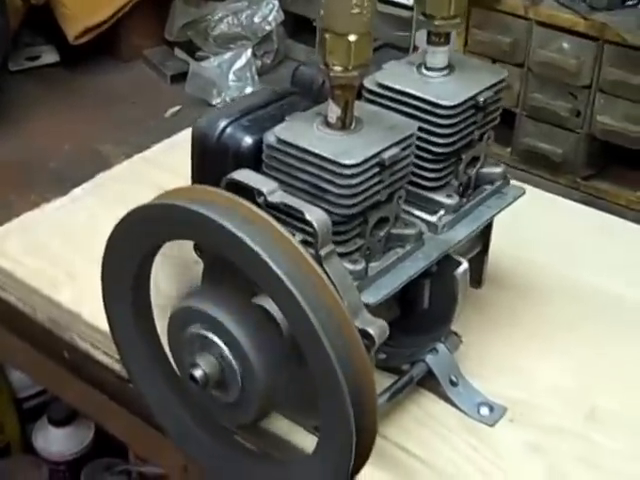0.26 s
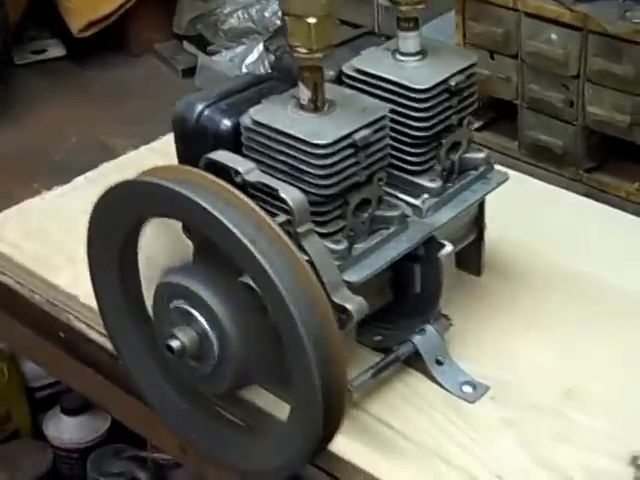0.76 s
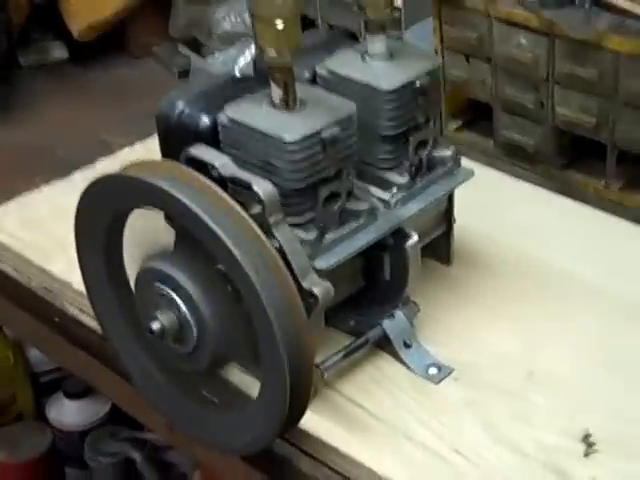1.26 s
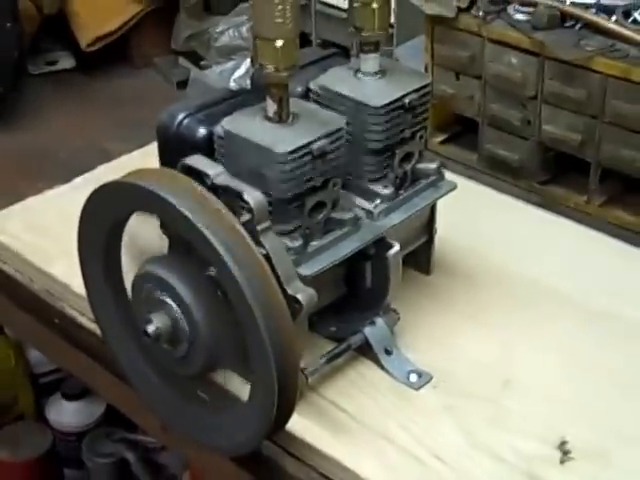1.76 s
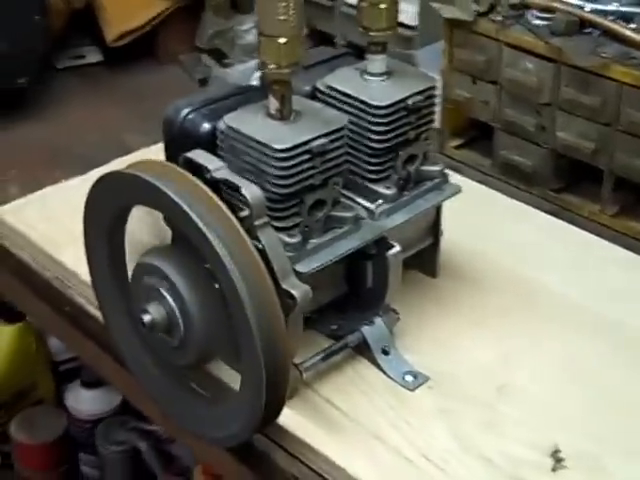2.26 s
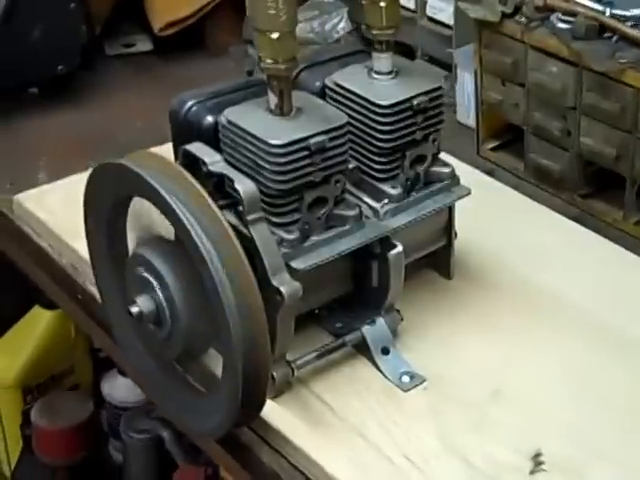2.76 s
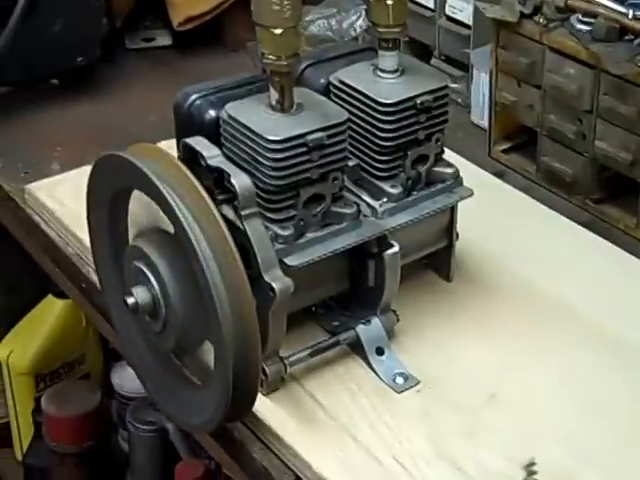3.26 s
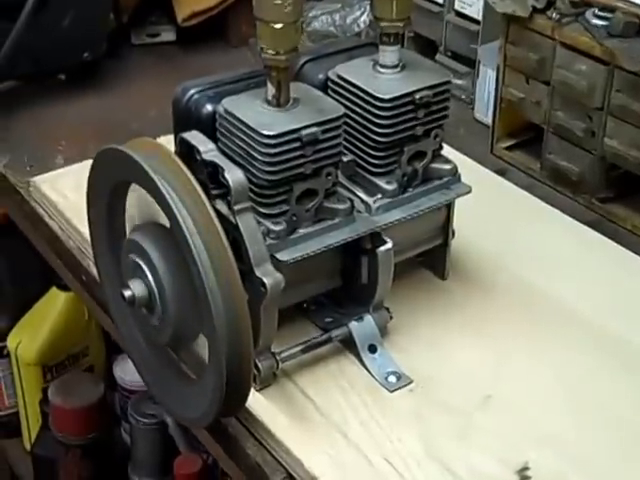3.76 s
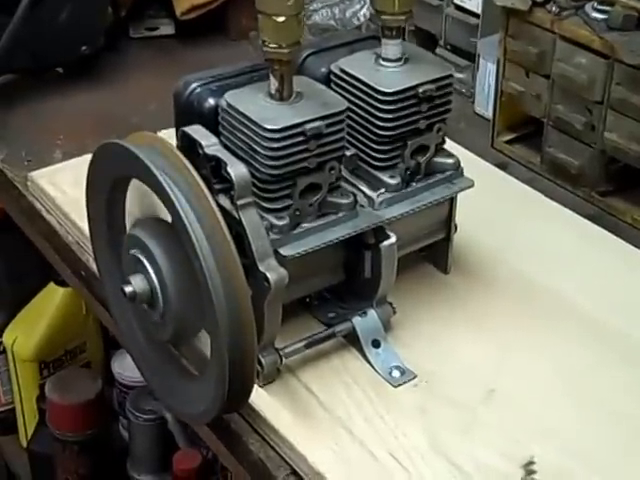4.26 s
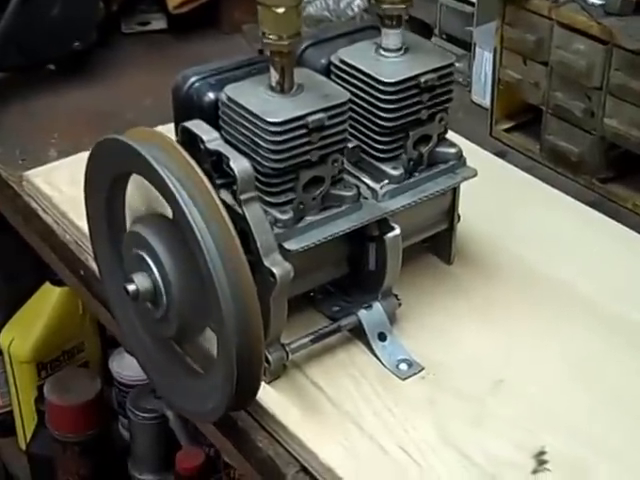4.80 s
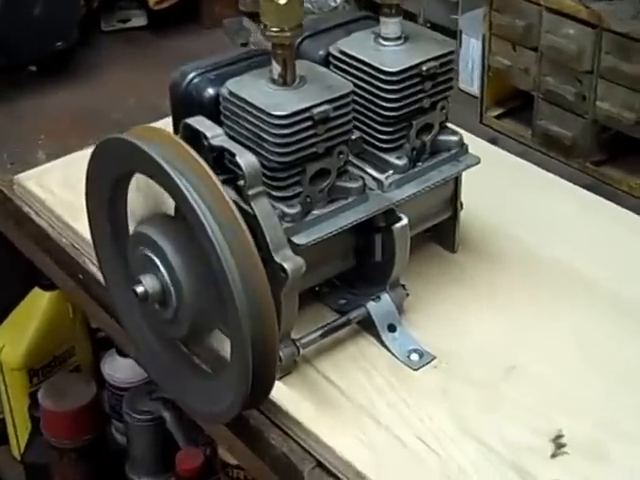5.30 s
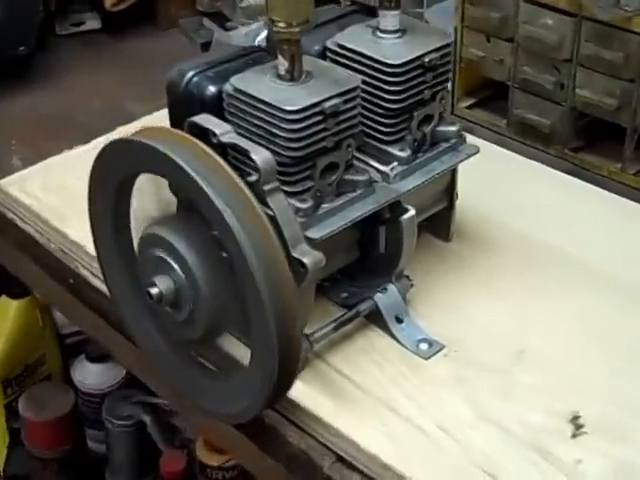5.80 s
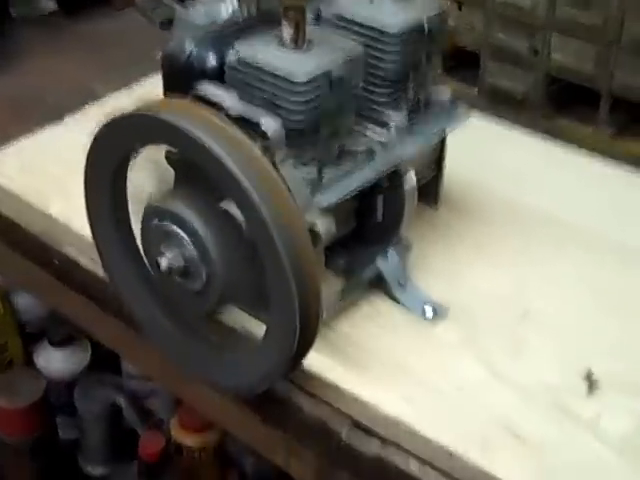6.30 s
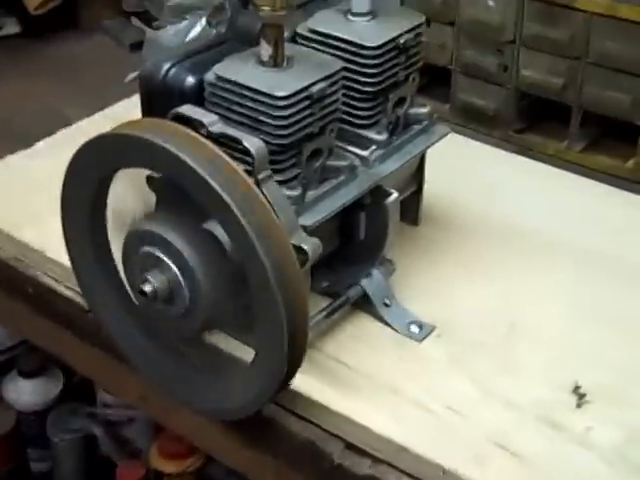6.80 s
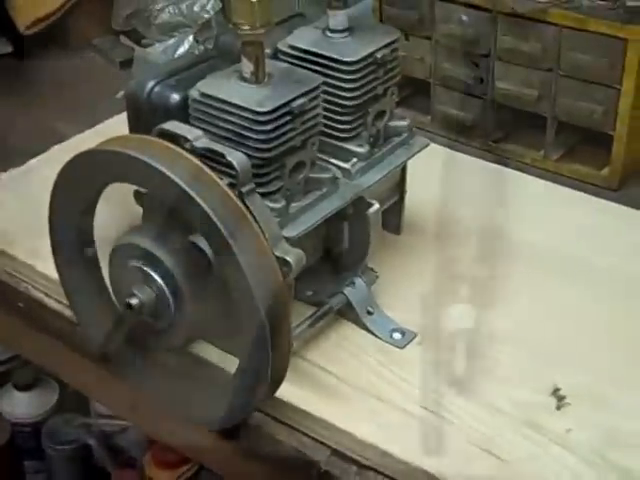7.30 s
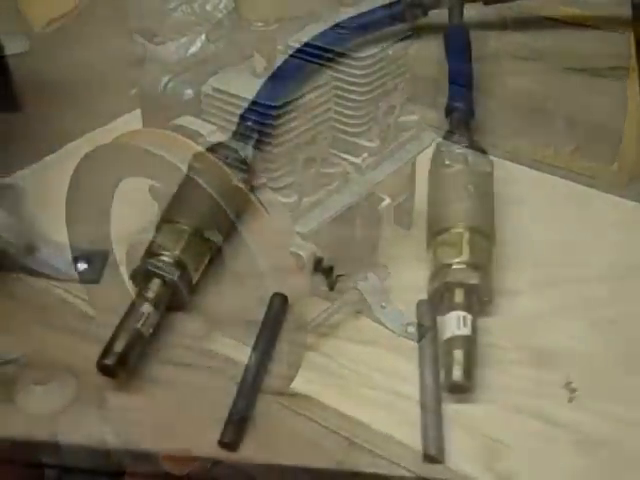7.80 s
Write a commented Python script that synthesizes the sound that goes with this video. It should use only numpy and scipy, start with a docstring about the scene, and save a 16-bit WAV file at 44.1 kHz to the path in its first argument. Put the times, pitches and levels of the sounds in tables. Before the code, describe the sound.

Fast, regular clacking from a bench engine driven by air: hard, bright knocks with short puffs alternate between two cylinders, with brief metallic ringing from fins and flywheel. Underneath are small linkage ticks, low hollow air gulps, stray rattles and a soft pulsing leak. Close stereo pickup in a small, fairly dry workshop. It runs almost steadily, slightly faster towards the end, then fades away, leaving quiet low electrical hum.

```python
"""A home-built twin-cylinder air engine turns on a workshop bench, climbing unevenly from 363 to 387 rpm.
Twice a turn a valve knocks open and air spits out: noise bursts coloured by each cylinder, with ringing sines.
Between knocks the pistons gulp air (gliding tones), the linkage ticks and parts clatter (noise bursts).
Place: a shop with leaking air (noise) and stray rattles; a stereo pair hears more direct sound than room.
The engine fades away at the end and a mains hum (two sines) comes up."""
import sys
import numpy as np
from scipy.fft import rfft, irfft, next_fast_len
from scipy.io import wavfile
from scipy.ndimage import uniform_filter1d, map_coordinates

SR = 44100
rng = np.random.default_rng(int(sys.argv[2]) if len(sys.argv) > 2 else 0)


def generate_wav(sig):
    """Save sig (samples, or channels by samples) to the path in sys.argv[1] as 16-bit PCM at SR."""
    pcm = np.round(np.clip(np.atleast_2d(sig).T, -1, 1) * 32767).astype(np.int16)
    wavfile.write(sys.argv[1], SR, pcm)


N = 354997
SPAN = SR // 4  # length of one blow with its room and ringing (samples)
BLOW_FFT = 2 ** 14


def amp(db):
    """Decibels to gain."""
    return 10 ** (np.asarray(db) / 20)


def unit(x):
    """Scale to rms 1."""
    return x / np.sqrt(np.mean(x ** 2) + 1e-20)


def along(points, hz):
    """Read a curve of (f/Hz, value) points on a log frequency axis."""
    f, value = np.transpose(points)
    return np.interp(np.log(hz + 1), np.log(f + 1), value)


def at_time(curve, s):
    """Read a curve of (t/s, value) points at the given times."""
    return np.interp(s, *np.transpose(curve))


def causal(db):
    """Minimum-phase response for a gain in dB: the cepstrum is folded onto positive times."""
    cepstrum = irfft(np.log(amp(db)))
    half = cepstrum.shape[-1] // 2
    cepstrum[..., 1:half] *= 2
    cepstrum[..., half + 1:] = 0
    return np.exp(rfft(cepstrum))


def spread(pair, alike, hz):
    """Two unrelated spectra become left and right microphone signals of the given likeness."""
    angle = np.arccos(np.clip(along(alike, hz), -1, 1)) / 2
    mid = pair[..., 0, :] * np.cos(angle)
    side = pair[..., 1, :] * np.sin(angle)
    return np.stack([mid + side, mid - side], axis=-2)


def add(out, s, sound):
    """Mix a sound in at time s, cut to the length of the scene."""
    start = round(s * SR)
    lo, hi = max(start, 0), min(start + sound.shape[-1], N)
    if hi > lo:
        out[:, lo:hi] += sound[..., lo - start:hi - start]


# flywheel speed: (t/s, speed/rpm)
FLYWHEEL_SPEED = [(0.0, 363.3), (0.6, 368.86), (1.41, 371.27), (1.61, 376.65), (2.01, 377.63),
                  (2.21, 371.79), (3.02, 372.33), (4.23, 380.28), (4.43, 377.43), (5.23, 378.28),
                  (5.43, 382.34), (6.04, 376.81), (6.64, 381.62), (7.45, 383.38), (7.65, 380.56),
                  (8.05, 387.17)]
FIRST_KNOCK_S = .0241  # the crank angle is counted from this knock of the first cylinder


def crank(turn):
    """Times at which the crank passes this part of its turn, from the summed flywheel speed."""
    t = np.arange(-SPAN, N + SPAN, 50) / SR
    turns = np.cumsum(at_time(FLYWHEEL_SPEED, t) / 60) * (t[1] - t[0])
    turns = turns - np.interp(FIRST_KNOCK_S, t, turns)
    return np.interp(np.arange(-1, int(turns[-1])) + turn, turns, t)


def bursts(times, envelope, fresh, count=5):
    """Flat spectra of dense vibration: nearly alike from blow to blow, drifting as the listener moves."""
    shapes = rng.standard_normal((count, 2, SPAN))
    place = np.asarray(times)[:, None] / (N / SR) * (count - 1) - np.arange(count)
    weights = np.cos(np.clip(place, -1, 1) * np.pi / 2)
    shared = np.tensordot(weights, shapes, 1)
    own = rng.standard_normal((len(times), 2, SPAN))
    fresh = np.clip(fresh, 0, 1)
    noise = np.sqrt(1 - fresh) * shared + np.sqrt(fresh) * own
    z = rfft((noise * envelope).astype(np.float32), BLOW_FFT)
    return z / np.sqrt(uniform_filter1d(np.abs(z) ** 2, size=70, axis=-1) + 1e-12)


# likeness of left and right, for direct sound and for the room: (f/Hz, likeness 0-1)
DIRECT_ALIKE = [(300, 0.89), (1400, .95), (3000, 0.83), (6000, 0.49), (9000, 0.13), (14000, 0.058)]
ROOM_ALIKE = [(35, 0.0016), (120, 0.99), (700, 0.92), (2000, 0.71), (6000, 0), (14000, 0.31)]


def blows(times, colour_db, rise_s, hold_s, t60_s, fresh, room_db, room_t60_s):
    """A coloured burst and the shop's answer for each time; rms 1 over the first 12 ms."""
    t, hz = np.arange(SPAN) / SR, np.fft.rfftfreq(BLOW_FFT, 1 / SR)
    direct_envelope = (1 - np.exp(-t / rise_s)) * amp(-60 * np.maximum(t - hold_s, 0) / t60_s)
    room_envelope = (1 - np.exp(-t / 0.018)) * amp(-60 * t / room_t60_s)
    direct = spread(bursts(times, direct_envelope, fresh), DIRECT_ALIKE, hz)
    room = spread(bursts(times, room_envelope, fresh=0.29), ROOM_ALIKE, hz)
    z = (direct + amp(room_db) * room) * causal(colour_db(hz))
    sound = irfft(z)[..., :SPAN]
    head = round(.012 * SR)
    return sound / np.sqrt(np.mean(sound[..., :head] ** 2, axis=(1, 2), keepdims=True))


# partials of the mains hum, before the overall hum level: (f/Hz, level/dB)
HUM_PARTIALS = [(59.6, -51), (119.2, -38.5)]


def hum(level_db=-3.5):
    """Mains hum in the workshop: steady sines."""
    t = np.arange(N) / SR
    return amp(level_db) * sum(amp(db) * np.sin(2 * np.pi * f * t) for f, db in HUM_PARTIALS)


# colour of the leak and shop noise, before it is set to one overall level: (f/Hz, level/dB)
LEAK_COLOUR = [(25, -18), (45, -15.5), (70, -20), (130, 3), (300, 1), (600, -2.5), (1200, -4.5), (2700, -4),
               (5500, 1.5), (7500, -5.5), (10000, -13.5), (14000, -36)]


def shop(level_db=-33.5, swell_db=2, flutter_db=1.7, flutter_rate_hz=110):
    """Air leaks past the pistons: coloured noise fluttering as it swells and sinks in every turn."""
    size = next_fast_len(N, real=True)
    t, hz = np.arange(N) / SR, np.fft.rfftfreq(size, 1 / SR)
    z = rfft(rng.standard_normal((2, size))) * amp(along(LEAK_COLOUR, hz))
    hiss = unit(irfft(spread(z, ROOM_ALIKE, hz))[:, :N])
    starts = crank(0)
    turn = np.interp(t, starts, np.arange(len(starts)))
    flutter_points = rng.standard_normal(int(t[-1] * flutter_rate_hz) + 2)
    flutter = map_coordinates(flutter_points, [t * flutter_rate_hz])
    pressure = amp(swell_db * np.cos(2 * np.pi * (turn - .45)) + flutter_db * flutter)
    return amp(level_db) * hiss * pressure


# relative colour of the loose parts: (f/Hz, level/dB)
RATTLE_COLOUR = [(500, -31), (1500, -22), (2700, -1), (4200, 1), (6000, 5), (8000, 1), (10500, 2),
                 (14000, -28)]


def rattles(rate_hz=7, level_db=-33):
    """Loose parts chatter at stray moments: short noise bursts of widely varying strength."""
    times = np.sort(rng.random(int(rate_hz * N / SR))) * N / SR
    out = np.zeros((2, N))
    ticks = blows(times, lambda hz: along(RATTLE_COLOUR, hz), rise_s=0.001, hold_s=0.0029, t60_s=0.034,
                  fresh=0.66, room_db=-20, room_t60_s=0.17)
    for s, tick in zip(times, ticks):
        add(out, s, amp(level_db + np.clip(rng.normal(0, 8.7), -6, 5)) * tick)
    return out


# small contacts and leaks in every turn; the filter is 6.5 dB down one width from f:
# (turn 0-1, f/Hz, width/Hz, t60/s, mean level/dB)
CONTACTS = [(.078, 5550, 350, .03, -18), (.118, 2700, 700, .025, -25), (.12, 900, 300, .03, -27),
            (.162, 10300, 300, .04, -30), (.42, 1000, 600, .07, -36), (.755, 2300, 600, .06, -34),
            (.775, 7000, 4500, .16, -35), (.9, 2400, 900, .04, -30)]


def clatter():
    """Light contacts and leaks recur at fixed crank angles: decaying puffs of band-limited noise."""
    size = 2 ** 12
    t, hz = np.arange(size) / SR, np.fft.rfftfreq(size, 1 / SR)
    out = np.zeros((2, N))
    for turn, centre, width, t60, db in CONTACTS:
        times = crank(turn)
        z = rfft(rng.standard_normal((len(times), 2, size)))
        z = z / (1 + ((hz - centre) / width * 1.06) ** 2)
        envelope = (1 - np.exp(-t / 0.0017)) * amp(-60 * t / t60)
        puffs = unit(irfft(spread(z, DIRECT_ALIKE, hz))) * envelope
        for s, puff, chance in zip(times, puffs, rng.standard_normal((len(times), 2))):
            add(out, s + 0.00077 * chance[0], amp(db + 3.1 * chance[1]) * puff)
    return out


# hollow gulps of air in every turn; the pitch glides as a piston moves; levels hold where the gulp
# strength equals its usual value: (turn 0-1, start f/Hz, end f/Hz, length/s, level/dB)
GULPS = [(.04, 540, 470, .016, -42), (.085, 820, 780, .014, -32), (.1, 205, 295, .039, -28),
         (.15, 730, 790, .016, -38), (.16, 360, 350, .028, -42), (.25, 62, 58, .07, -45),
         (.31, 340, 310, .02, -39), (.345, 135, 110, .018, -36), (.41, 400, 450, .018, -38),
         (.425, 165, 280, .033, -33), (.48, 500, 560, .02, -37), (.655, 425, 455, .02, -34),
         (.68, 170, 160, .014, -42), (.79, 135, 125, .018, -41), (.89, 150, 125, .018, -29.5),
         (.975, 110, 105, .02, -39)]
# the gulps sound louder or softer as the listener moves; taken relative to the usual value: (t/s, level/dB)
GULP_STRENGTH = [(0, -38.5), (1.2, -38), (2.5, -39), (4.2, -40.5), (5.5, -40), (6.3, -38.5), (7.25, -38)]


def gulps(usual_db=-38):
    """Air drawn through the ports sounds the cylinder cavities: gliding sines, much alike in every turn."""
    out = np.zeros((2, N))
    for turn, start_hz, end_hz, length, db in GULPS:
        u = np.linspace(0, 1, round(length * SR))
        cycles = np.cumsum(start_hz + (end_hz - start_hz) * u) / SR
        times = crank(turn)
        for s, chance in zip(times, rng.standard_normal((len(times), 2))):
            tone = np.sin(np.pi * u) * np.sin(2 * np.pi * cycles * (1 + 0.005 * chance[0]))
            level_db = db - usual_db + 0.45 * chance[1] + at_time(GULP_STRENGTH, s)
            add(out, s, amp(level_db) * tone)
    return out


# relative colour of the linkage tick: (f/Hz, level/dB)
SLACK_COLOUR = [(500, -15), (1200, -4.5), (1900, 9.5), (2300, 3), (2750, 6.5), (4000, -4.5), (6000, -3),
                (7000, 6), (8500, -9), (14000, -15)]


def linkage(turn=.392, level_db=-27.0, scatter_db=1.0):
    """Before the second knock the slack takes up with a dry tick, harder in some turns than in others."""
    times = crank(turn)
    out = np.zeros((2, N))
    ticks = blows(times, lambda hz: along(SLACK_COLOUR, hz), rise_s=0.00056, hold_s=0.0056, t60_s=0.024,
                  fresh=0.44, room_db=-29, room_t60_s=.25)
    for s, tick, chance in zip(times, ticks, rng.uniform(-2, 2, (len(times), 2))):
        add(out, s + .0005 * chance[0], amp(level_db + scatter_db * chance[1]) * tick)
    return out


def knocks(turn, force, ringing, body_db, treble_db, scatter_db):
    """One knock a turn, never seated quite alike: rows of (t/s, force, body, treble and ring level/dB)."""
    s = crank(turn)
    usual = np.broadcast_arrays(s, at_time(force, s), body_db, treble_db, at_time(ringing, s))
    scatter = [.0002, *scatter_db]  # s about the crank angle, then dB for the other columns
    return np.transpose(usual) + np.clip(rng.standard_normal((len(s), len(scatter))), -2, 2) * scatter


# long ringing of the fins and flywheel, levels relative before the ring level is added:
# (f/Hz, t60/s, level/dB under the first knock, level/dB under the second, share following the ring level 0-1)
RING_MODES = [(751, .16, -8, -17, 0), (823, .16, -8, -19, 0), (1045, .14, -15, -9, 0),
              (1427, .12, -4, -15, 0), (2700, .1, -4, -2, .3), (3122, .33, 1, -10, 1),
              (3790, .22, -16, 0, 1), (4021, .19, -8, -5, .2), (4185, .16, -8, -8, .1),
              (4658, .14, -8, -8, 0), (5410, .13, 1, -15, 0), (5600, .13, 1, -15, 0),
              (6376, .16, -5, -6, .3), (6685, .22, -5, -15, .3), (6930, .19, -15, 2, .7),
              (7638, .19, -23, -3, .8), (8835, .15, -29, -10, .8)]
# the middle ring of the castings swells as the listener moves round to the side: (t/s, level/dB)
SIDEWAYS = [(0, -0.5), (2.2, 4), (2.8, 8.5), (4, 3.5), (5.3, 3.5), (5.9, 3), (8.05, -4)]
# how far each frequency takes part in that swell: (f/Hz, share 0-1)
MIDDLE_RING = [(2200, 0.063), (2600, 1), (2850, 0.36), (3200, 0)]


def cylinder(rows, colour, body, side, column, level_db, ring_db=4, **shape):
    """Each knock excites the damped casting, every resonance a little differently, and rings the fins."""
    s, force_db, body_db, treble_db, rings_db = np.transpose(rows)
    t, out = np.arange(SPAN) / SR, np.zeros((2, N))
    contact_db = rng.normal(0, 2.5, (len(s), len(body)))

    def left_right_db(hz):
        return np.outer([.5, -.5], along(side, hz))

    def colour_db(hz):
        centre, width, peak_db = np.transpose(body)
        bumps = 1 / (1 + (2 * (hz - centre[:, None]) / width[:, None]) ** 2)
        casting = along(colour, hz) + (peak_db + contact_db) @ bumps
        low_tilt = np.outer(body_db, along([(2000, 0.88), (5000, 0.12)], hz))
        high_tilt = np.outer(treble_db, along([(6000, 0), (7500, 1)], hz))
        facing = np.outer(at_time(SIDEWAYS, s), along(MIDDLE_RING, hz))
        return (casting + low_tilt + high_tilt + facing)[:, None] + left_right_db(hz)

    modes = np.array(RING_MODES)
    hz, t60, mode_db = modes[:, 0], modes[:, 1], modes[:, 2 + column]
    # a knock's ring level governs the modes at least as strong in its own cylinder as in the other
    follows = np.clip(modes[:, 4], 0, 1) * (mode_db >= modes[:, 3 - column])
    decay = amp(-60 * t / t60[:, None]) * (1 - np.exp(-t / 0.0052))
    ears = amp(left_right_db(hz))
    for i, burst in enumerate(blows(s, colour_db, **shape)):
        drive_db = follows * rings_db[i] + (1 - follows) * (force_db[i] - 22.5)
        strength = amp(drive_db + ring_db + mode_db + rng.normal(0, 2.1, len(hz)))
        # each ringing tone is two close sines, detuned afresh at every knock, that beat together
        pitch = hz + rng.normal(0, 16, (2, len(hz)))
        phase = 2 * np.pi * (pitch[..., None] * t + rng.random((2, len(hz), 1)))
        ringing = decay * np.sin(phase.astype(np.float32)).sum(axis=0) / np.sqrt(2)
        add(out, s[i] - .0006, amp(force_db[i] + level_db) * burst + (ears * strength) @ ringing)
    return out


# broad relative colour of the first knock: (f/Hz, level/dB)
FIRST_COLOUR = [(200, -45), (450, -21.5), (700, -31.5), (1200, -27.5), (2400, -28.5), (4500, -25),
                (6000, -24.5), (7500, -10), (9200, -21.5), (11500, -31.5), (14000, -35), (15500, -45)]
# damped resonances of the first casting: (f/Hz, width/Hz at half the dB peak, mean peak level/dB)
FIRST_BODY = [(855, 80, 14.5), (1140, 67, 8.5), (1404, 275, 17.5), (1910, 700, 13), (2230, 52, 11),
              (2778, 400, 18), (3285, 345, 16), (3862, 154, 10), (4016, 122, 17), (4600, 70, 11.5),
              (5250, 910, 13.5), (5620, 616, 19.5), (6230, 413, 15), (6894, 540, 10.5), (10280, 400, 6.5)]
# where the first cylinder sounds between the microphones: (f/Hz, left minus right level/dB)
FIRST_SIDE = [(500, -0.6), (3000, -0.6), (4500, 2), (5400, -2.5), (6300, -1), (7000, -1), (7800, 13),
              (9000, 6), (10500, 16.5), (13000, -2)]
# strength of the first knocks, before the cylinder's level: (t/s, level/dB)
FIRST_FORCE = [(0, -9), (2.3, -8.5), (6.5, -9)]
# ring level of the first cylinder, before the mode levels: (t/s, level/dB)
FIRST_RINGING = [(0, -26.5), (.25, -34), (1.3, -34.5), (1.7, -50), (2.2, -51), (2.5, -33), (3.3, -48),
                 (5.8, -43), (5.95, -28), (6.4, -26.5), (6.8, -38), (7.3, -35), (8, -28)]


def first_cylinder():
    """The first valve knocks open once a turn and its casting colours the spat air."""
    rows = knocks(0, FIRST_FORCE, FIRST_RINGING, body_db=-1.5, treble_db=-0.5,
                  scatter_db=[0.44, 1.2, 0.2, 1.5])  # force, body, treble, ring
    return cylinder(rows, FIRST_COLOUR, FIRST_BODY, FIRST_SIDE, column=0, level_db=-0.72, rise_s=0.0011,
                    hold_s=0.0028, t60_s=0.026, fresh=0.18, room_db=-10.5, room_t60_s=0.12)


# broad relative colour of the second knock: (f/Hz, level/dB)
SECOND_COLOUR = [(200, -44), (450, -16.5), (700, -31), (1200, -36), (2400, -28), (4500, -10.5),
                 (6000, -9.5), (7500, -14), (9200, -16), (11500, -24.5), (14000, -28), (15500, -57)]
# damped resonances of the second casting: (f/Hz, width/Hz at half the dB peak, mean peak level/dB)
SECOND_BODY = [(1069, 160, 16.7), (1410, 650, 16.9), (1940, 400, 13.3), (2672, 634, 15.2), (3134, 240, 9.6),
               (3700, 250, 12.3), (4207, 82, 9.2), (4330, 24, 1.2), (6970, 460, 2.15), (7040, 297, 15.7),
               (7560, 73, 13.6), (8060, 110, 9.3), (8790, 270, 7.5), (10650, 470, 6.9)]
# where the second cylinder sounds between the microphones: (f/Hz, left minus right level/dB)
SECOND_SIDE = [(500, -1), (3000, -0.5), (4500, 1.5), (5400, -7), (6300, 12), (7000, -0.5), (7800, 9.5),
               (9000, 14.5), (10500, 10.5), (13000, 8)]
# strength of the second knocks, soft for a couple of turns, before the cylinder's level: (t/s, level/dB)
SECOND_FORCE = [(1.9, -11), (2.2, -13), (2.5, -11.5), (3.3, -11), (5.5, -11.5), (6.8, -10.5)]
# ring level of the second cylinder, before the mode levels: (t/s, level/dB)
SECOND_RINGING = [(0, -35.5), (1.7, -45), (3, -34.5), (5.5, -37), (7.3, -31)]


def second_cylinder():
    """The second valve knocks open about half a turn later, through a casting of another colour."""
    rows = knocks(.503, SECOND_FORCE, SECOND_RINGING, body_db=1.13, treble_db=0.1,
                  scatter_db=[.6, 1.8, 0.34, 3])  # force, body, treble, ring
    return cylinder(rows, SECOND_COLOUR, SECOND_BODY, SECOND_SIDE, column=1, level_db=-1.87, rise_s=.001,
                    hold_s=0.0033, t60_s=0.034, fresh=0.22, room_db=-9.5, room_t60_s=0.25)


def scene(fade_start_s=7.13, fade_length_s=1.0, hum_share=0.22):
    """Shop, running gear and both cylinders; the engine fades evenly and the faint hum comes up."""
    engine = shop() + rattles() + clatter() + gulps() + linkage()
    engine += first_cylinder() + second_cylinder()
    gone = np.clip((np.arange(N) / SR - fade_start_s) / fade_length_s, 0, 1)
    return (1 - gone) * engine + np.maximum(gone, hum_share) * hum()


def record(dry, top_hz=14400):
    """Peaks beyond full scale are clipped; then nothing passes above the band limit."""
    size = next_fast_len(N + SPAN, real=True)
    passband = np.fft.rfftfreq(size, 1 / SR) < top_hz
    clipped = np.clip(dry, -1, 1)
    return irfft(rfft(clipped, size) * passband, size)[:, :N]


dry = scene()
out = record(dry)
generate_wav(out)
```